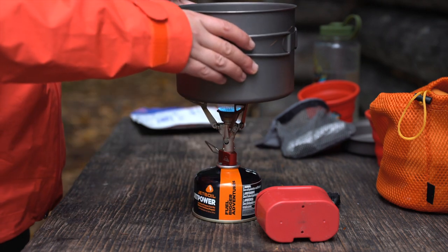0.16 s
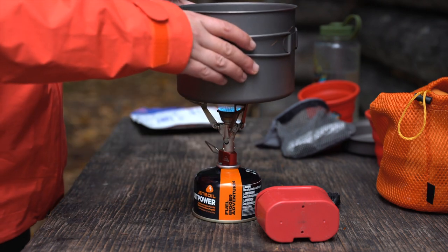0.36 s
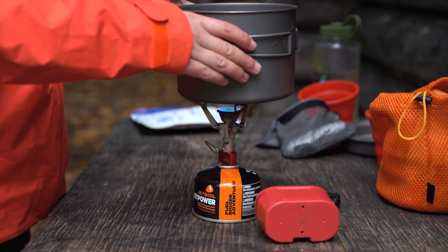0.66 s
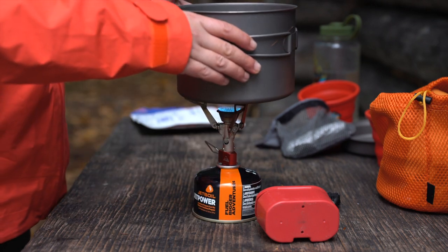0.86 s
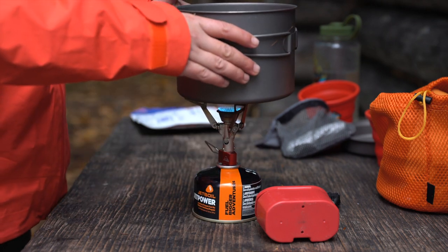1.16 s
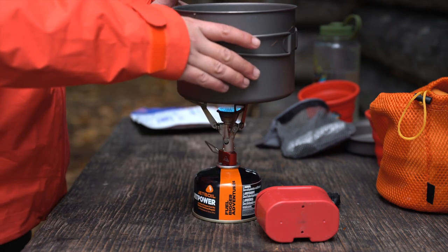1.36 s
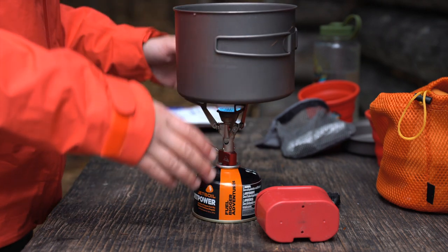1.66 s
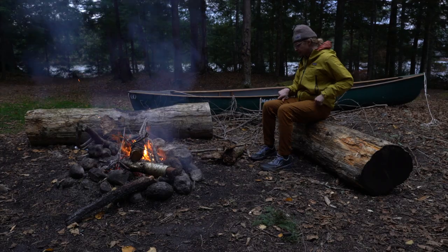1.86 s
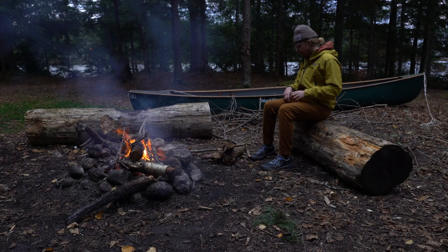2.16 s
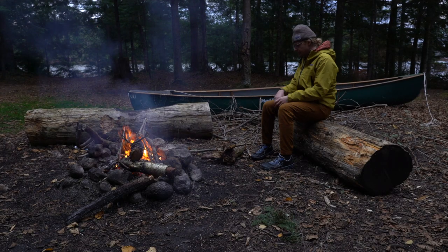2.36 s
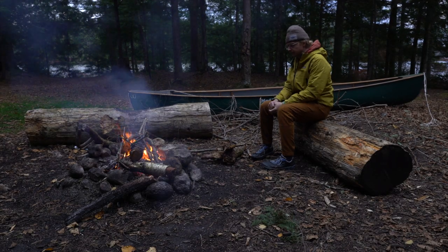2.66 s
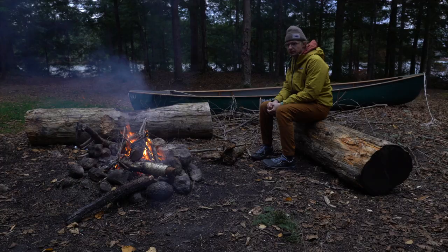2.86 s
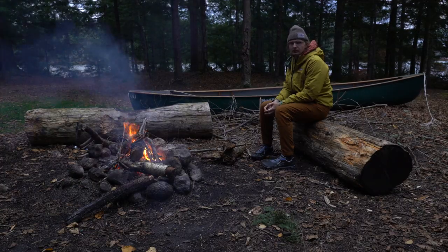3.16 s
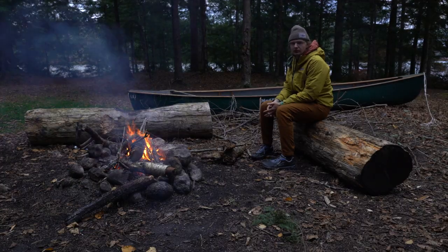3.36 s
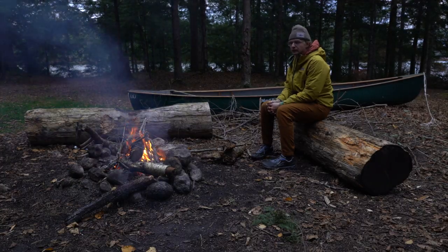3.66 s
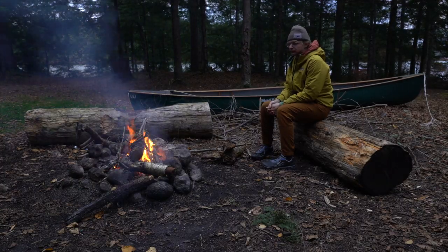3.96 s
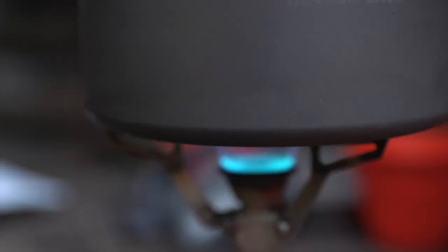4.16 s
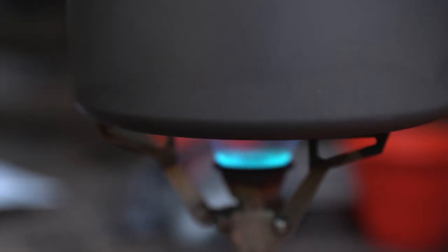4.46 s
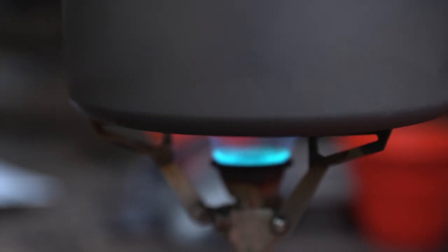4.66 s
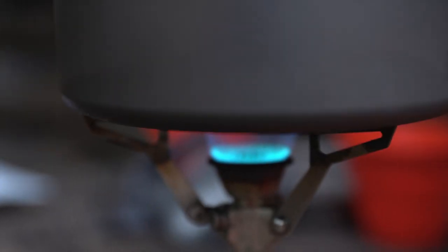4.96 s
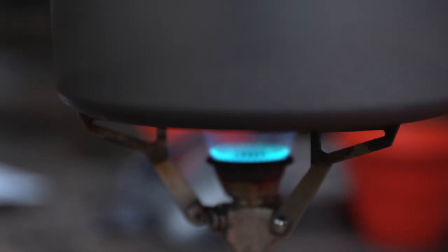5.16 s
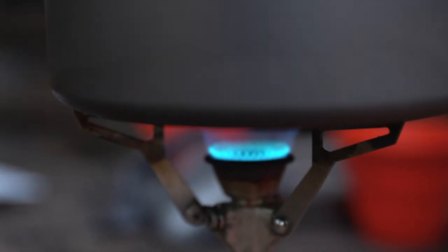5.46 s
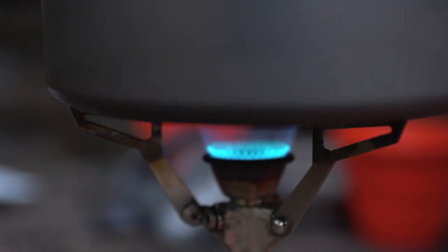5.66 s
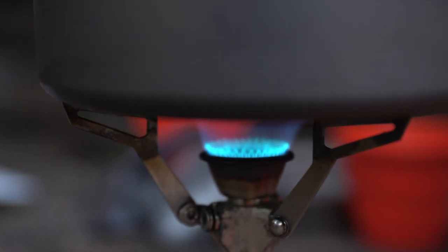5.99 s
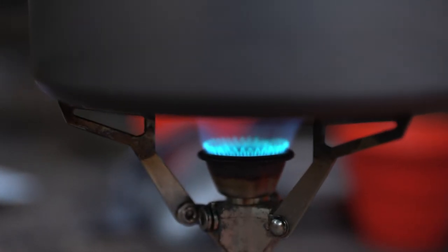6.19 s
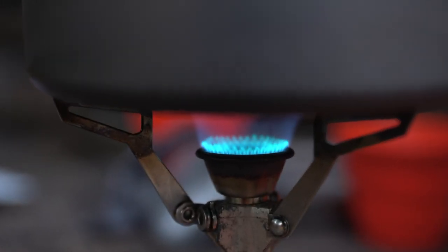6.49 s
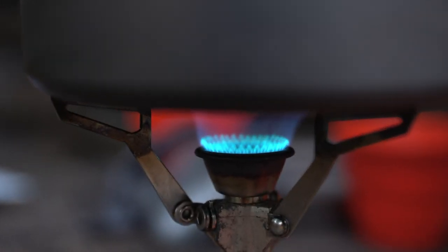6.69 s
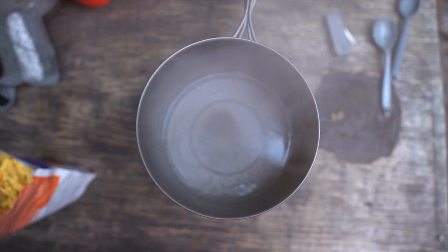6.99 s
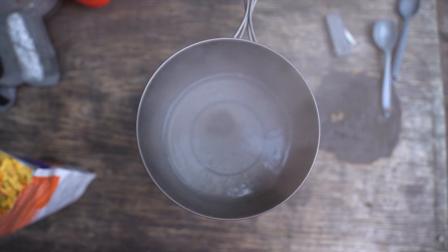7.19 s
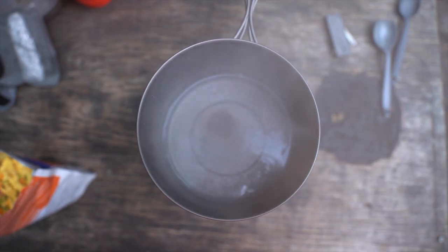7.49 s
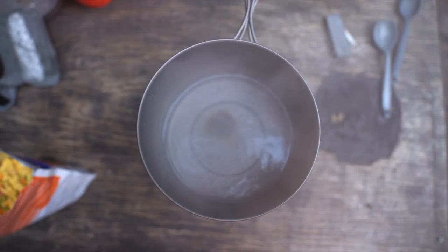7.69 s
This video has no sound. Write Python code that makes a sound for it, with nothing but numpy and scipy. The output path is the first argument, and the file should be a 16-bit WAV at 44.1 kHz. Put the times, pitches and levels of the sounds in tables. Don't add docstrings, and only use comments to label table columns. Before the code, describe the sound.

Steady camp stove roar and hiss in woodland, shifting abruptly in closeness, with sharp campfire pops on the right and a few soft footfalls.

```python
import sys
import numpy as np
from scipy import signal
from scipy.fft import rfft, irfft, next_fast_len
from scipy.io import wavfile
from scipy.ndimage import uniform_filter1d, minimum_filter1d, map_coordinates

SR = 44100
rng = np.random.default_rng(int(sys.argv[2]) if len(sys.argv) > 2 else 0)


def convert_level_to_amplitude(level_db):
    exponent = np.asarray(level_db, float) / 20
    return 10 ** exponent


def store_pcm(level_fs):
    pcm = np.round(np.clip(level_fs, -1, 1) * 32767).astype(np.int16)
    wavfile.write(sys.argv[1], SR, np.atleast_2d(pcm).T)


N = 345285
TOP_HZ = 15745

PLACE_EDGES = [0, 1.726, 4.157, 6.757, 7.9]
# centre in Hz, width in Hz, level in dB.
ROAR_RESONANCES = [
    [(137, 16, -18.5), (229, 28, -15.5), (312.4, 15, -5), (484, 46, -4.5), (710, 65, -1.5), (910, 45, -7.5),
     (1168, 196, -0.5), (1374, 86, -1.5), (1560, 54, -10), (1730, 84, -8), (2030, 63, -10.5),
     (2253, 43, -5), (2520, 70, -12), (2676, 45, -9.5)],
    [(288, 130, -10.5), (638, 145, -12), (1094, 480, 0)],
    [(141, 21, -28.5), (200, 9, -15.5), (430, 120, -2), (580, 35, -5.5), (710, 144, -6), (1024, 124, -6.5),
     (1377, 197, -1.5), (1549, 39, -1), (1815, 58, -7), (2026, 190, -8), (2205, 70, -5.5), (2510, 270, -9),
     (2600, 92, -28)],
    [(138, 13, -17.5), (360, 36, -2), (440, 72, 1), (557, 40, -9), (880, 270, -12), (1184, 94, -5.5),
     (1400, 160, -5.5), (1590, 100, -13), (1900, 97, -16), (2210, 88, -20), (2460, 135, -9.5)],
]
# frequency in Hz, density in dB per Hz.
ROAR_BED = [
    [(18, -74), (30, -34), (150, -20), (400, 1), (1200, -3.5), (2400, -21), (4000, -11), (5200, -49),
     (8800, -120)],
    [(18, -64), (30, -23), (151, -11.5), (237, -11), (527, -0.5), (647, 3.5), (974, -0.5), (1730, 4),
     (4000, -16), (5200, -48), (8800, -120)],
    [(18, -68), (30, -44), (130, -23.5), (400, -12), (1400, -8), (2300, -14), (3100, -39), (4000, -41),
     (5200, -44), (8800, -120)],
    [(18, -82), (30, -54), (100, -19.5), (300, -13), (700, -20), (1500, -19), (2300, -15), (4000, -21),
     (5200, -58), (8800, -120)],
]
# frequency in Hz, level in dB.
HISS_SPECTRUM = [
    [(1650, 0), (2800, -1), (3370, 3), (3800, -7.5), (4920, -1.5), (6620, -11), (9600, -9), (11500, -14),
     (15100, -13.5), (16100, -30), (16500, -43)],
    [(1650, -1), (2800, -1.5), (4400, -3), (4920, -2.5), (9250, -4.5), (15100, -9.5), (15800, -9),
     (16100, -1), (16500, -40)],
    [(1650, -23), (2800, -2.5), (3200, -10.5), (3950, -11.5), (4750, -8), (5200, -13), (5600, -14),
     (6200, -15.5), (7500, -20.5), (9200, -21.5), (9800, -17.5), (10500, -20.5), (12000, -26.5),
     (15700, -27)],
    [(1650, -33), (2800, -7.5), (4200, -3.5), (5000, -0.5), (5400, -4.5), (8200, -7.5), (9300, -5.5),
     (10000, -0.5), (10600, -1), (11500, 0), (12300, -2.5), (12900, -7), (13600, -3), (14500, -13),
     (15700, -9)],
]
# frequency in Hz, correlation from 0 to 1.
CORRELATION = [
    [(60, 0.99), (290, 0.99), (690, 0.92), (1380, 0.9), (2070, .55), (2930, 0.45), (5000, 0.35),
     (15000, 0.2)],
    [(60, 0.97), (290, 0.94), (690, 0.72), (1700, 0.6), (2400, .4), (3400, 0.15), (15000, 0.14)],
    [(290, 0.99), (690, 0.91), (1030, .55), (1380, 0.88), (1720, .3), (2200, .6), (3450, .45), (8000, 0.2)],
    [(290, 0.995), (1380, 0.97), (2070, .62), (2410, .8), (3450, 0.55), (4800, .25), (6500, 0.55),
     (13000, 0.25)],
]
# frequency in Hz, left over right in dB.
LEVEL_TILT = [
    [(60, 0.0), (240, -0.5), (950, -1.0), (3770, -2.0), (15000, -3.0)],
    [(60, 0.0), (240, 0.5), (950, 1.5), (3770, 0.5), (15000, 0.0)],
    [(60, 0.0), (240, -1.5), (950, -2.5), (3770, -2.5), (15000, -3.0)],
    [(60, 0.0), (240, -0.5), (950, -3.0), (3770, -2.5), (15000, -1.0)],
]
# frequency in Hz, lead of the right port in radians.
PHASE_LEAD = [
    [(700, 0), (2900, .3), (3450, -.3), (5500, -.7)],
    [(1400, -.1), (2100, -.8), (3000, -1), (6000, -.4), (9000, .4)],
    [(700, 0), (1380, -.45), (1750, -.3), (2070, 1.2), (2400, 3.5), (4100, 3.7), (4800, 5.9), (10000, 5.7)],
    [(2900, 0), (3450, 2.3), (4130, 2.9), (4800, 4.8), (7750, 5.5), (10300, 6.4)],
]
# centre in Hz, width in Hz, depth from 0 to 1.
ECHO_NOTCHES = [
    [(175, 18, 0.3), (280, 25, .3), (367, 20, 0.4), (2220, 50, 0.5), (3130, 70, .35), (3800, 60, 0.4)],
    [(1570, 60, 0.3)],
    [(168, 14, .6), (523, 17, 0), (910, 80, 0.13), (1690, 54, 0), (1890, 50, .35), (2060, 40, 0.45),
     (2330, 60, 0.3), (3030, 82, 0.45), (3570, 200, .2), (4000, 80, 0.4)],
    [(194, 25, 0.2), (636, 35, 0.3), (1070, 45, 0.7), (1520, 35, .3), (1785, 50, 0.2), (2320, 45, .5),
     (2750, 60, .35), (3040, 50, 0.4), (10500, 300, .25)],
]
# roar in dB, hiss in dB, roar drift in dB/s, hiss drift in dB/s.
STOVE_LEVELS = [
    (-45.5, -52.5, -1.1, -1.4),
    (-52.5, -57.5, -0.9, -1.6),
    (-38, -48.5, 0.28, -0.2),
    (-41, -48, -0.8, -0.4),
]
# start in dB, time constant in seconds.
STOVE_FADE_IN = [
    (0, .05),
    (0, .05),
    (-3, .04),
    (0, .05),
]
# centre in seconds, half length in seconds,
# hiss rise in dB.
HISS_SWELLS = [
    (1.886, 0.039, 6),
    (2.402, 0.21, 8),
    (4.148, 0.057, 10.5),
    (4.507, 0.083, 1),
    (6.043, 0.23, 3),
]
# start in seconds, level in dB.
THUDS = [
    (1.74, -66),
    (1.85, -71),
    (2.10, -68),
    (2.629, -62),
    (2.67, -68),
    (2.82, -74),
    (3.0, -75),
    (3.07, -82),
    (7.79, -72),
]
# frequency in Hz, t60 in seconds.
TREE_DECAY = [
    (300, 0.37),
    (1500, 0.14),
    (6000, 0.28),
    (15000, 0.33),
]
# start in seconds, peak in dB, ring in Hz, upper ring in dB, rattle t60 in s.
LOG_DROPS = [
    (1.666, -15, 430, 1, 0.014),
    (4.4437, -19.5, 760, -2, 0.0084),
]
LEFT_LAG = [6, 0, 7, 5]
FIRE_PAN = [-8, -2.5, -7, -7.5]
FIRE_AIR = [1, 1.5, 1, -1]
# start in seconds, peak in dB, crack in Hz, sharp edge in dB, echo in dB.
TWIGS = [(.0112, -27, 6740, -13.5, -8), (.361, -22, 6260, -6, -3), (.5928, -26.5, 6160, -5.5, -3.5),
         (1.1546, -33.5, 3370, 5, -2), (1.29, -37, 6300, -5, 1), (1.3789, -29, 5700, -1, -10),
         (1.574, -19, 6240, -5, -11.5), (1.5755, -16.5, 5400, -16, -4), (1.6662, -21, 7260, -10.5, -5),
         (1.669, -24.5, 5200, -20, 3.5), (3.9882, -23.5, 6440, -32, -3), (3.988, -29, 3800, -34, -7),
         (2.1118, -41.5, 5310, -2, -7), (2.5571, -33.5, 7600, -16, -10), (2.7431, -35.5, 3630, -10, -11),
         (2.8304, -26.5, 6200, -21, -19), (2.8318, -40, 4560, -24, -20), (4.0474, -35, 5470, -6, 5),
         (4.2619, -23, 7400, -9.5, -15), (4.3905, -28.5, 6700, -5, -14), (5.0202, -24.5, 5360, -0.5, -11),
         (5.1386, -29, 4900, 2, -14), (5.2566, -23, 7700, -9.5, -9.5), (5.8482, -4, 5770, -13.5, -13),
         (5.8785, -11, 5640, -11.5, -3.5), (6.0807, -16.5, 5700, -9.5, -11)]
# start in seconds, peak in dB, crack in Hz, edge in dB, echo in dB.
LOGS = [(0.038, -37, 3970, -18, 3.5), (0.7354, -25, 5650, -5, 1), (0.9935, -27.5, 5700, -5, -0.5),
        (1.5725, -11, 5700, -8.5, -3.5), (4.3234, -29.5, 6700, -6, -16), (4.4439, -11.5, 5200, -9, -11.5),
        (6.2203, -30, 5500, 8, -3), (6.239, -28, 4700, -2, -9), (6.3047, -18.5, 5800, -1.5, -5.5),
        (6.3804, -29.5, 4980, -2, -7), (6.5022, -35.5, 5350, -11, -9), (7.064, -23, 4770, -15, -12),
        (7.2453, -29, 6740, -28, -3), (7.689, -36, 7170, -12, -4)]
# start in seconds, peak in dB, crack in Hz.
EMBERS = [(0.2047, -35, 4160), (.521, -47, 3410), (.813, -42, 5540), (1.1205, -39, 5150),
          (1.8635, -41, 4100), (2.0802, -43, 5700), (2.1555, -39.5, 5280), (2.173, -38, 4100),
          (2.327, -35.5, 5200), (2.4304, -44.5, 3950), (2.558, -35, 5030), (2.607, -49, 3000),
          (2.6672, -42.5, 4070), (2.672, -38.5, 5100), (2.8737, -42.5, 9000), (2.909, -47, 7170),
          (2.9595, -46, 3960), (3.207, -43, 5940), (3.5047, -46.5, 3340), (3.634, -48, 6300),
          (4.0201, -34.5, 5730), (4.6162, -42, 4980), (4.795, -39, 4870), (4.881, -36.5, 5230),
          (6.36, -38, 4800), (6.6054, -42, 4590), (6.6603, -41, 4730), (7.167, -37.5, 6700),
          (7.18, -38, 6500), (7.34, -43, 4950)]
# start in seconds, peak in dB.
SPLINTERS = [(.37, -31), (.975, -50), (1.5524, -39), (1.5605, -39), (1.675, -34), (3.999, -45),
             (4.1804, -44), (4.269, -35), (4.277, -46), (4.338, -38), (4.452, -30), (.509, -47),
             (2.565, -46), (2.681, -53), (2.7505, -48), (2.754, -46), (4.2015, -52), (4.2405, -52),
             (5.797, -43), (5.887, -31), (7.007, -46), (7.0654, -31), (7.272, -44), (5.857, -17),
             (5.8655, -30), (5.8738, -31), (5.9, -27), (5.914, -30), (6.088, -33)]
# start in seconds, extra body in dB, extra left over right in dB.
ODD_WOOD = [(.361, 3.5, -1.5), (.5928, 5.5, 3), (.7352, 3, 2.5), (.9934, 4.5, 1), (1.3789, 10, 1.5),
            (2.1555, 4, 0), (2.327, 5, 0), (2.4307, 8, -4), (2.5574, 5, -7), (2.7431, 0, 7),
            (2.8302, 4.5, -3.5), (3.9883, 0, 6), (4.0206, 3, 7), (4.0486, -2, 0), (4.2617, 4, -2),
            (4.3234, 0, -2), (4.4437, 1, -2), (5.0203, 3, 3), (5.2563, 8, -0.5), (5.8487, 3, 3),
            (5.8787, 4, -1), (6.0808, 4, -2.5), (6.3052, 5, -0.5), (7.064, 4.5, 3.5), (7.2456, 4, -1)]


def unit(x):
    return x / np.sqrt(np.mean(x ** 2) + 1e-20)


def along(points, hz):
    f, v = np.transpose(points)
    return np.interp(np.log(hz + 1), np.log(f + 1), v)


def wobble(size, rate):
    knots = rng.standard_normal(int(size * rate / SR) + 4)
    return map_coordinates(knots, [np.arange(size) * rate / SR])


def filtered(x, response):
    m = next_fast_len(x.shape[-1] + 4096)
    return irfft(rfft(x, m) * response(np.fft.rfftfreq(m, 1 / SR)), m)[..., :x.shape[-1]]


def peak(hz, centre_hz, width_hz):
    return 1j * hz * width_hz / (centre_hz ** 2 - hz ** 2 + 1j * hz * width_hz + 1e-9)


def thuds():
    out, t = np.zeros(N + SR), np.arange(SR // 4) / SR
    push = t / 0.02 * np.exp(1 - t / 0.018)
    for start, db in THUDS:
        lump = filtered(rng.standard_normal(len(t)), lambda hz: peak(hz, 71, 130) ** 2)
        out[round(start * SR):][:len(t)] += convert_level_to_amplitude(db) * unit(lump) * push
    return out[:N]


def trees(size):
    hz, t, z = signal.stft(rng.standard_normal((2, size)), SR, nperseg=128)
    z[1] *= np.clip(hz / 2500, .1, 1)[:, None]
    decay = convert_level_to_amplitude(-60 * t / along(TREE_DECAY, hz)[:, None])
    mid, side = signal.istft(z * decay, SR, nperseg=128)[1][:, :size]
    u = np.arange(size) / SR
    swell = np.exp(-u / 0.0091) + 0.52 * (1 - np.exp(-(u / 0.019) ** 2))
    tail = filtered(np.array([mid + side, mid - side]) * swell, lambda hz: hz < TOP_HZ)
    return tail / np.linalg.norm(tail[0])


def log_drop():
    out, u = np.zeros((2, N + SR)), np.arange(2600) / SR
    for start, db, ring_hz, upper_db, t60 in LOG_DROPS:
        blow = rng.standard_normal(len(u)) * convert_level_to_amplitude(-60 * u / t60)
        blow[:3] = 2.6
        echo = filtered(trees(size=len(u)), lambda hz: peak(hz, 1600, 2600))
        echo = convert_level_to_amplitude(6) * np.linalg.norm(blow) * echo * np.clip(u / 0.015, 0, 1)
        wood = lambda hz: (peak(hz, ring_hz, 0.29 * ring_hz) * peak(hz, 0.78 * ring_hz, 920)
                           - 1.05 * peak(hz, 1280, 360)
                           + convert_level_to_amplitude(upper_db) * peak(hz, 2330, 640) * peak(hz, 1820, 790))
        shading = lambda hz: convert_level_to_amplitude(np.outer([-3, 3], np.clip(hz / 1200, 0, 1)))
        rattle = filtered(blow + echo, lambda hz: wood(hz) * shading(hz))
        rattle[0] = np.roll(rattle[0], shift=LEFT_LAG[0])
        low_ring = lambda hz: peak(hz, ring_hz, 0.52 * ring_hz) * peak(hz, 0.65 * ring_hz, 0.97 * ring_hz)
        thump = filtered(1. * (u < 1 / SR), low_ring)
        sound = rattle / np.max(np.abs(rattle)) + convert_level_to_amplitude(-13.5) * thump / np.max(np.abs(thump))
        out[:, round(start * SR) + 30:][:, :len(u)] += convert_level_to_amplitude(db + 8.0) * sound
    return out[:, :N]


def pop(excite, crack_hz, edge_db, body_db):
    crack = lambda hz: (1.3 * peak(hz, .9 * crack_hz, 1900) * peak(hz, 1.12 * crack_hz, 2400)
                        + .2 * peak(hz, 7500, 7000) * peak(hz, 6000, 9000))
    steep = lambda hz: 1j * hz / (0.57 * crack_hz) * peak(hz, 0.52 * crack_hz, 0.44 * crack_hz)
    edge = lambda hz: convert_level_to_amplitude(edge_db) * peak(hz, 10830, 10500) * peak(hz, 8570, 13400)
    body = lambda hz: convert_level_to_amplitude(body_db + 12.0) * peak(hz, 2420, 1640) * peak(hz, 1200, 3400)
    return filtered(excite, lambda hz: crack(hz) * steep(hz) - edge(hz) - body(hz))


def bursts(place):
    ember_edge_db = [-13, -7.5, -4, -19][place]
    rows = [(*row, -24) for row in TWIGS]
    rows += [(*row, -16) for row in LOGS]
    rows += [(*row, ember_edge_db, -3, -15.5) for row in EMBERS]  # edge, echo, body dB
    rows += [(*row, 7400, -7, -1, -19) for row in SPLINTERS]
    pops = []
    for *voice, body_db in rows:
        near = [odd[1:] for odd in ODD_WOOD if abs(odd[0] - voice[0]) < .003]
        extra_body_db, extra_pan_db = np.sum([(0, 0)] + near, axis=0)
        pops.append((*voice, body_db + extra_body_db, FIRE_PAN[place] + extra_pan_db))
    return pops


def fire(place, t):
    out, u = np.zeros((2, len(t) + SR)), np.arange(900) / SR
    tearing = 0.61 * convert_level_to_amplitude(-60 * u / 0.0063) + 0.17 * convert_level_to_amplitude(-60 * u / 0.0082)
    onset = 1 - np.exp(-(u / 0.00049) ** 2)
    for start, db, crack_hz, edge_db, wet_db, body_db, pan_db in bursts(place):
        if not t[0] <= start < t[-1]:
            continue
        burst = rng.standard_normal((2, len(u))) * tearing * onset
        burst[0] = 0.97 * burst[0] + 0.28 * burst[1]
        burst[:, :2] = 1.8
        sharp_db = edge_db + FIRE_AIR[place]
        left = pop(burst[0], crack_hz, sharp_db + 0.25 * pan_db, body_db - 0.21 * pan_db)
        right = pop(burst[1], crack_hz, sharp_db - 0.25 * pan_db, body_db + 0.21 * pan_db)
        gain = convert_level_to_amplitude(db + 7.0) / np.max(np.abs(right))
        at = round((start - t[0]) * SR) + 30
        out[0, at + LEFT_LAG[place]:][:len(u)] += convert_level_to_amplitude(pan_db / 2) * gain * left
        out[1, at:][:len(u)] += convert_level_to_amplitude(-pan_db / 2) * gain * right
        tail = pop(trees(size=9000), crack_hz, max(edge_db, -12) - 0.7, body_db + 3.5)
        tail *= np.linalg.norm(burst[1])
        echo_gain = convert_level_to_amplitude(wet_db + 0.22 * pan_db * np.array([[1], [-1]])) * gain
        out[:, at + 60:][:, :tail.shape[1]] += echo_gain * tail
    return out[:, :len(t)]


def rush(size, gain, place, patchy_db):
    z = signal.stft(rng.standard_normal((2, size + 512)), nperseg=512)[2]
    field = uniform_filter1d(rng.standard_normal(z.shape[1:]), size=5, axis=0)
    field = uniform_filter1d(field, size=8, axis=1)
    pair = signal.istft(z * convert_level_to_amplitude(patchy_db * unit(field)), nperseg=512)[1][:, :size]
    turn = lambda hz: np.arccos(np.clip(along(CORRELATION[place], hz), -1, .995)) / 2
    dips = lambda hz: np.prod([1 - np.clip(depth, 0, 1) * np.abs(peak(hz, c, w)) ** 2
                               for c, w, depth in ECHO_NOTCHES[place]], axis=0)
    mid, side = filtered(pair, lambda hz: gain(hz) * dips(hz) * [np.cos(turn(hz)), np.sin(turn(hz))])
    tilt = lambda hz: convert_level_to_amplitude(np.outer([.5, -.5], along(LEVEL_TILT[place], hz)))
    lead = lambda hz: np.exp(np.outer([-.5j, .5j], along(PHASE_LEAD[place], hz)))
    return unit(filtered(np.array([mid + side, mid - side]), lambda hz: tilt(hz) * lead(hz)))


def stove(place, t):
    roar_db, hiss_db, roar_drift_db, hiss_drift_db = STOVE_LEVELS[place]
    size, elapsed = len(t), t - t[0]
    swell_db = sum(db * np.exp(-((t - s) / half) ** 2) for s, half, db in HISS_SWELLS if t[0] <= s < t[-1])
    flutter_db = .25 * wobble(size, 3) + 0.95 * wobble(size, 30.15)

    top_db = max(db for _, _, db in ROAR_RESONANCES[place])
    bands = lambda hz: sum(convert_level_to_amplitude(db - top_db) ** 2 * np.abs(peak(hz, c, 1.53 * w)) ** 4
                           for c, w, db in ROAR_RESONANCES[place])
    bed = lambda hz: convert_level_to_amplitude(along(ROAR_BED[place], hz) - 8.5) ** 2
    roar = rush(size, lambda hz: np.sqrt(bands(hz) * (hz < TOP_HZ) + bed(hz)), place, patchy_db=.9)
    roar_gain = convert_level_to_amplitude(roar_db + roar_drift_db * elapsed + 0.14 * swell_db + flutter_db)

    jet = lambda hz: convert_level_to_amplitude(along(HISS_SPECTRUM[place], hz)) * (hz > 1500) * (hz < TOP_HZ)
    hiss = rush(size, jet, place, patchy_db=1.8)
    leaves = filtered(hiss, lambda hz: peak(hz, 3240, 2500))
    hiss = hiss + convert_level_to_amplitude(-11) * (1 - convert_level_to_amplitude(-swell_db)) * leaves
    hiss_gain = convert_level_to_amplitude(hiss_db + hiss_drift_db * elapsed + swell_db + .5 * flutter_db)
    return roar_gain * roar + hiss_gain * hiss


def scene():
    edges = np.minimum(np.round(np.array(PLACE_EDGES) * SR).astype(int), N)
    spans = [np.arange(a, b) / SR for a, b in zip(edges, edges[1:])]
    flames = []
    for place, t in enumerate(spans):
        start_db, settle_s = STOVE_FADE_IN[place]
        flames.append(convert_level_to_amplitude(start_db * np.exp(-(t - t[0]) / settle_s)) * stove(place, t))
    flame = np.concatenate(flames, axis=1)
    pops = np.concatenate([fire(place, t) for place, t in enumerate(spans)], axis=1)
    shade = lambda hz: convert_level_to_amplitude(-19 * (hz > TOP_HZ) - .02 * np.maximum(hz - TOP_HZ, 0)) * (hz < 17000)
    steady = filtered(flame + log_drop(), lambda hz: hz < TOP_HZ)
    return steady + filtered(pops, shade) + thuds()


def band_limit(x):
    return signal.sosfilt(signal.butter(12, 17030, fs=SR, output="sos"), x)


def record(dry):
    over_db = np.maximum(20 * np.log10(np.max(np.abs(dry), axis=0) + 1e-9) + 4, 0)
    held_db = -minimum_filter1d(-over_db, size=200)
    fall_db = 90 * np.arange(N) / SR
    duck_db = np.maximum.accumulate(held_db + fall_db) - fall_db
    return band_limit(dry * convert_level_to_amplitude(-.85 * uniform_filter1d(duck_db, size=90)))


dry = scene()
out = record(dry)
store_pcm(out)
```